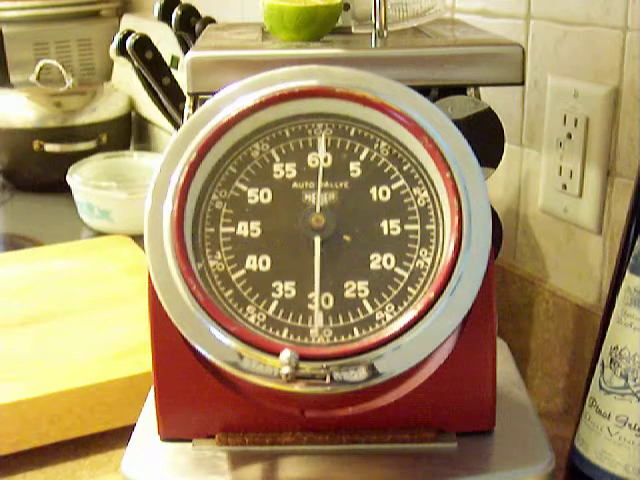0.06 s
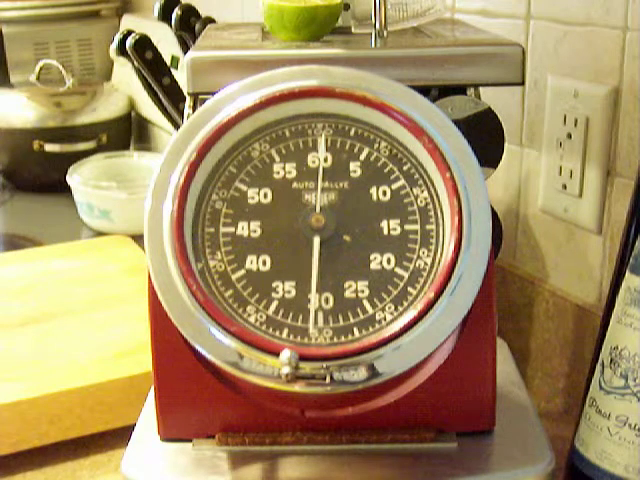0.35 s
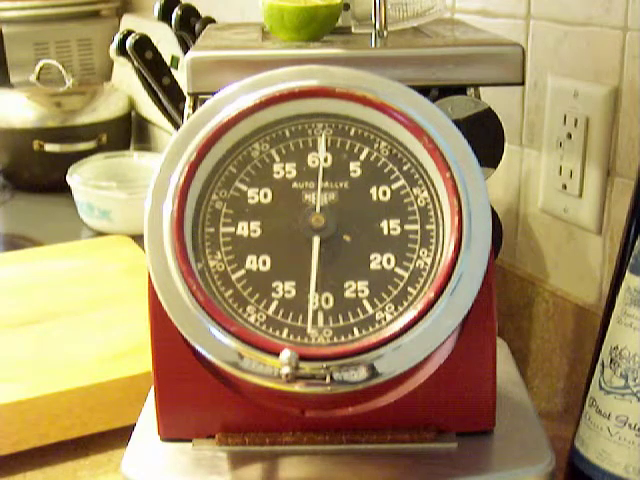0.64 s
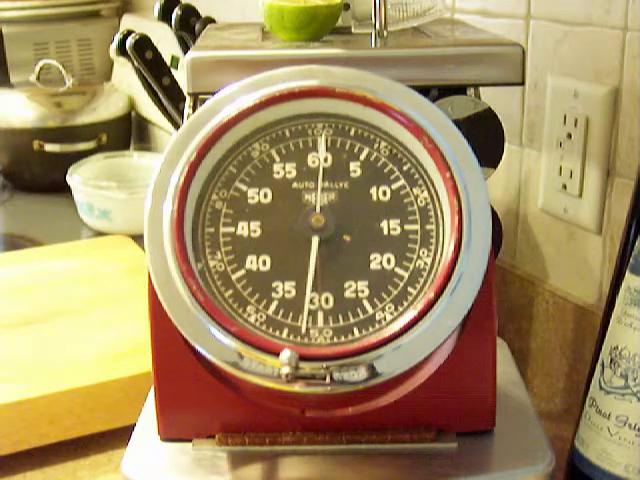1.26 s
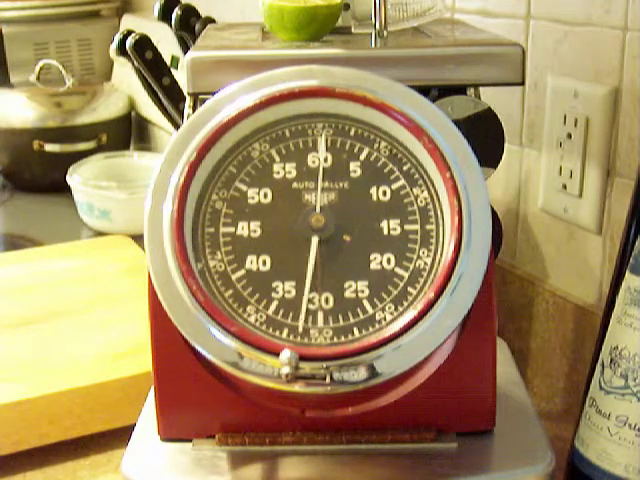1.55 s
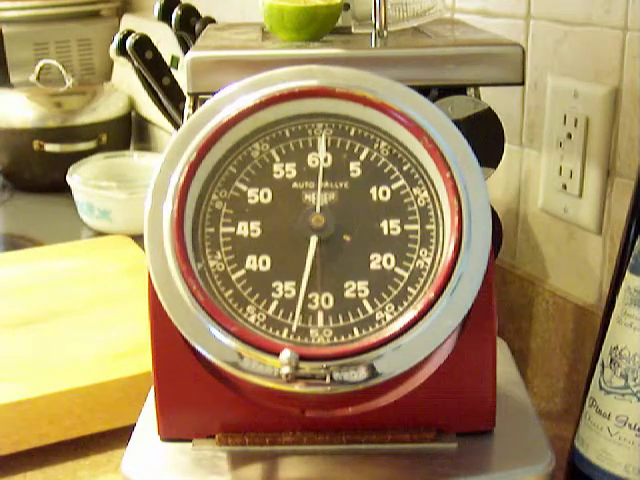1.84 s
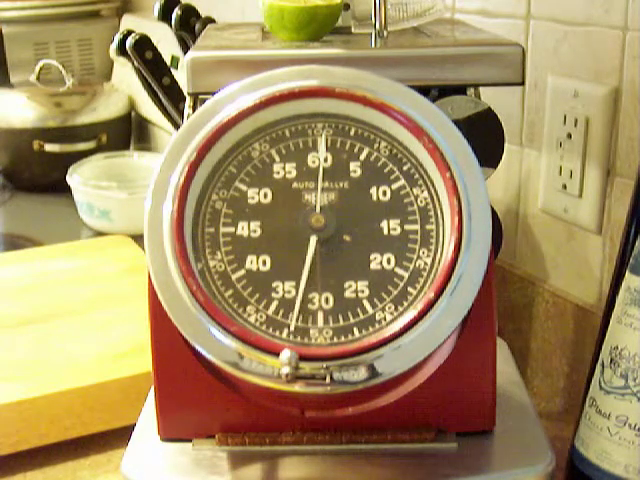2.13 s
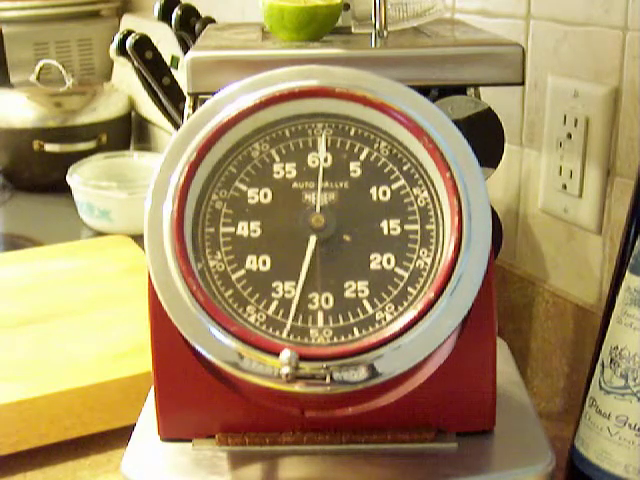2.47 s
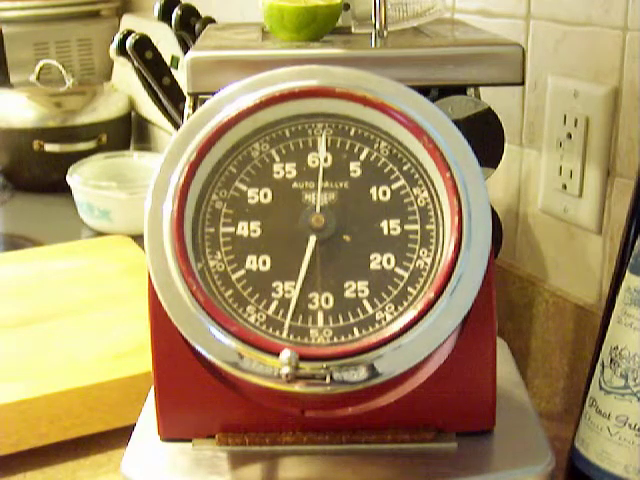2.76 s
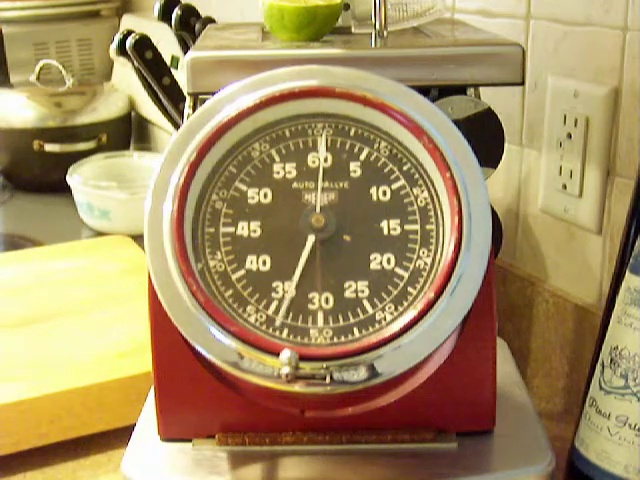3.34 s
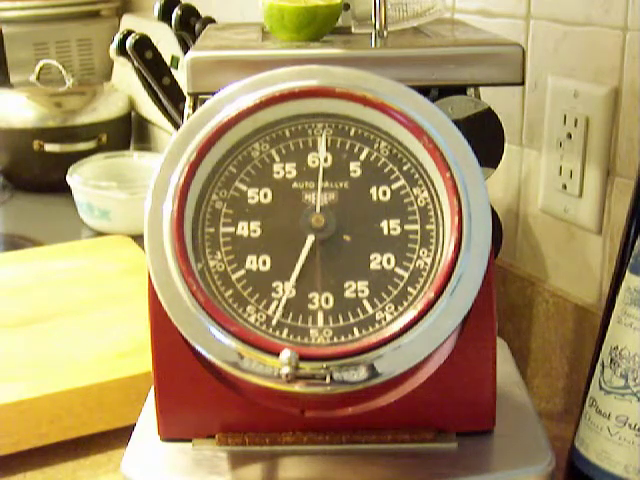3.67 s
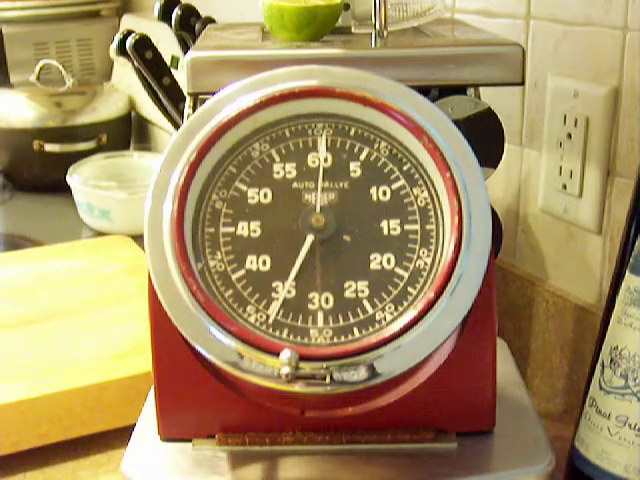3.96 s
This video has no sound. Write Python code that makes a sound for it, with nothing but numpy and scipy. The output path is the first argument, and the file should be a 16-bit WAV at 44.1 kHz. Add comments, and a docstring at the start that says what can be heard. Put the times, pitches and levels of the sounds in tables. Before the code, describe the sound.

A mechanical stopwatch ticks close by from about 0.1 seconds to the end at around 4 seconds, at an even four beats a second, alternating tick and tock. Each beat is a tiny cluster of scraping metal clicks with a slight ring and a very short room tail. Underneath, faint hiss, a low throbbing appliance hum and a thin high tone continue throughout in the quiet kitchen.

```python
"""Faint room noise, a throbbing appliance hum and a thin high tone fill a quiet kitchen from the start.
In front, a mechanical stopwatch runs at about four beats a second, tick and tock in turn.
Each beat is a quick run of contacts in the escapement (unlock, push, drop) that scrape and ring
the works; the drop also snaps and rings the case. Tiles and worktop add a short tail."""
import sys
import numpy as np
from scipy import signal
from scipy.fft import rfft, irfft
from scipy.io import wavfile
from scipy.ndimage import uniform_filter1d

SR = 44100
rng = np.random.default_rng(int(sys.argv[2]) if len(sys.argv) > 2 else 0)


def store_pcm(level_fs):
    """Save levels as 16-bit WAV."""
    pcm = np.round(np.clip(level_fs, -1, 1) * 32767).astype(np.int16)
    wavfile.write(sys.argv[1], SR, np.atleast_2d(pcm).T)


N = 4 * SR


def amp(db):
    """Decibels to gain."""
    return 10 ** (np.asarray(db) / 20)


def unit_rms(x):
    """Scales to rms 1."""
    return x / np.sqrt(np.mean(abs(x) ** 2) + 1e-20)


def db_at(spectrum, hz):
    """Interpolates (Hz, dB) points on a log-frequency axis."""
    points_hz, points_db = np.transpose(spectrum)
    return np.interp(np.log(hz + 1), np.log(points_hz + 1), points_db)


def colour(x, spectrum):
    """Filters x by (Hz, dB) points."""
    hz = np.fft.rfftfreq(len(x), 1 / SR)
    return irfft(rfft(x) * amp(db_at(spectrum, hz)), len(x))


def add(mix, start_s, sound):
    """Mixes a sound in at start_s."""
    part = mix[max(round(start_s * SR), 0):][:len(sound)]
    part += sound[:len(part)]


# Room noise floor. Each row: frequency in Hz, relative density in dB.
ROOM_SPECTRUM = [(15, -9), (40, 0.5), (85, 3.5), (170, 8), (370, 7), (650, 4), (1050, 3), (1350, 0.5),
                 (2000, -4), (2750, -4.5), (3400, -9), (5500, -12.5), (7000, -15.5), (9000, -16)]
# Room noise resonances. Each row: centre in Hz, half width in Hz, boost in dB.
ROOM_PEAKS = [(146.3, 13.5, 6.5), (288, 22, 3.5), (469.5, 22.4, 6), (618, 22, 4), (770, 20, 1.5),
              (974, 15, 3.5), (1750, 4.7, 6.5), (2002, 13, 6), (2640, 30, 1)]


def room_noise(rms_db=-44, flicker_db=0.36):
    """Steady rush with a few resonances and a slight flicker."""
    hz, _, bins = signal.stft(rng.standard_normal(N), SR, nperseg=4096)
    peaks_db = sum(db / (1 + ((hz - centre) / width) ** 4) for centre, width, db in ROOM_PEAKS)
    shape_db = db_at(ROOM_SPECTRUM, hz) + peaks_db
    flicker = unit_rms(uniform_filter1d(rng.standard_normal(bins.shape), size=24, axis=0))
    _, rush = signal.istft(bins * amp(shape_db[:, None] + flicker_db * flicker))
    return amp(rms_db) * unit_rms(rush[:N])


def drift(cutoff_hz):
    """Slow complex noise of rms 1."""
    noise = rng.standard_normal(N) + 1j * rng.standard_normal(N)
    rolloff = 1 + (np.fft.fftfreq(N, 1 / SR) / cutoff_hz) ** 4
    return unit_rms(np.fft.ifft(np.fft.fft(noise) / rolloff))


def wavering_tone(hz, rms_db, waver, throb_at_s=0.169):
    """A tone drifting in level and phase; close tones swell together at throb_at_s."""
    cycles = hz * (np.arange(N) / SR - throb_at_s)
    wobble = 1 + waver * drift(cutoff_hz=3.3)
    return amp(rms_db) * unit_rms((wobble * np.exp(2j * np.pi * cycles)).real)


def appliance():
    """Mains hum beats against a motor tone, under a faint whine."""
    mains = wavering_tone(hz=120.05, rms_db=-49.5, waver=0.041)
    motor = wavering_tone(hz=124.95, rms_db=-59.5, waver=0.041)
    whine = wavering_tone(hz=1090.1, rms_db=-58, waver=0.2)
    return mains + motor + whine


def high_tone(hz=6743, rms_db=-65.5):
    """A thin, steady electrical tone."""
    return amp(rms_db) * unit_rms(np.sin(2 * np.pi * hz * np.arange(N) / SR))


def ring(modes, t, force, rise_s, spread_db, detune=0.0027):
    """Struck modes die away; level and pitch vary from blow to blow."""
    hz, db, t60_s = np.transpose(modes)[:, :, None]
    louder, sharper = rng.standard_normal((2, len(hz), 1))
    level_db = db + db_at(force, hz) + spread_db * louder
    waves = np.sin(2 * np.pi * (hz * (1 + detune * sharper) * t + rng.random(hz.shape)))
    decay = np.exp(-np.log(1000) * t / t60_s)
    return (amp(level_db) * decay * waves).sum(0) * np.minimum(t / rise_s, 1)


# Steel contact noise. Each row: frequency in Hz, relative level in dB.
GRIT_SPECTRUM = [(300, -20), (900, -11), (1450, 7), (2100, -1), (2900, -6), (4200, -9.5), (5400, -4),
                 (6300, -7.5), (7300, -7.5), (8500, -2.5)]
# Modes of the works (plates, springs) and case. Each row: frequency in Hz, base level in dB, T60 in s.
WORKS_MODES = [(1990, -57.5, 0.065), (2620, -50, 0.055), (2804, -45, 0.054), (3570, -49.5, 0.055),
               (4970, -57, 0.058), (5340, -50.5, .05), (5570, -47.5, .06), (5750, -56.5, 0.043),
               (7130, -51, 0.056), (7190, -51, 0.057), (7730, -48, .035), (8360, -53.5, 0.035)]
CASE_MODES = [(1595, -40, 0.1), (1465, -47, 0.041)]


def contact(scrape_s, force, works_db, case_db, is_drop, snap_at_s=0.002, snap_width_s=0.00036):
    """Steel slides on steel and rings the works; at the drop a tooth hits the pallet and rings the case."""
    t = np.arange(6144) / SR
    steel_noise = unit_rms(colour(rng.standard_normal(len(t)), GRIT_SPECTRUM))
    grit = amp(-35) * colour(steel_noise, force)
    scrape = 2 * t / scrape_s * np.exp(-(t / scrape_s) ** 2)
    works = amp(works_db) * ring(WORKS_MODES, t, force, rise_s=0.0014, spread_db=2)
    sound = grit * scrape + works
    if is_drop:
        snap = amp(-5) * np.exp(-((t - snap_at_s) / snap_width_s) ** 2)
        case = amp(case_db) * ring(CASE_MODES, t, force, rise_s=0.002, spread_db=-1.5)
        sound += grit * snap + case
    return sound


# Beats, tick first. Each row: time of the drop in seconds, strength in dB, case ring in dB.
BEAT_SCORE = [(.1312, 0.5, 4.5), (.3872, 1.5, 1), (.6318, 0.5, 5), (.8905, 1, 1), (1.137, -0.5, 4.5),
              (1.3932, 0.5, -2), (1.6405, -1, 4.5), (1.896, 0, 4), (2.144, -0.5, -7), (2.400, -0.5, 1),
              (2.6482, 0, 5), (2.9035, .5, -3), (3.151, -0.5, 2), (3.4072, 1.5, 4.5), (3.6535, 0, -0.5),
              (3.9098, -.5, -3)]
# Frequencies of the four force bands in Hz.
FORCE_HZ = [1470, 2870, 5330, 7600]
# Contacts in a beat. Each row: offset from the drop in seconds, scrape time in seconds,
# gain in dB at each of FORCE_HZ, works ring in dB.
TICK_CONTACTS = [(-.0385, 0.0033, -13, -21, -4.5, -3, -2.5), (-.0335, 0.0026, -0.5, -4, -9.5, -6.5, 2),
                 (-.0280, .004, -13, -17, -8, -10, -4), (-.0088, 0.0071, -7.5, -11, -3, -1.5, -4),
                 (0, .004, -2.5, -3.5, 0, -2.5, 0.5), (.0055, .004, -9.5, -11, -10, -9.5, -3)]
TOCK_CONTACTS = [(-.0387, 0.0035, -17, -11, -4.5, 4, -11), (-.0335, 0.0048, -19, -5, -18, -18.5, 2),
                 (-.0275, 0.0049, -19.5, -22, -11, -16.5, -5), (-.0165, 0.0048, -2, -5, -12, -12, -7),
                 (-.0108, .005, -6, -5, -3.5, -7, -0.5), (0, 0.0027, -4.5, -1.5, -2.5, -1, -2),
                 (.0035, 0.0068, -5, 2, -2, -13.5, -4)]


def stopwatch(jitter_s=0.00052, spread_db=0.5):
    """Two pallets take turns; the contacts around each drop vary a little in time and force."""
    mix = np.zeros(N)
    for beat, (drop_s, beat_db, case_db) in enumerate(BEAT_SCORE):
        for offset_s, scrape_s, *band_db, works_db in (TICK_CONTACTS, TOCK_CONTACTS)[beat % 2]:
            is_drop = offset_s == 0
            later, harder = rng.standard_normal(2) * (not is_drop)
            force = list(zip(FORCE_HZ, band_db))
            sound = contact(scrape_s, force, works_db, case_db, is_drop)
            add(mix, drop_s + offset_s + jitter_s * later, amp(beat_db + spread_db * harder) * sound)
    return mix


def kitchen_reverb(direct, tail_db=-12, t60_s=0.14, rise_s=0.0026):
    """Tiles and worktop add a faint, short tail."""
    t = np.arange(SR // 2) / SR
    envelope = np.exp(-np.log(1000) * t / t60_s) * np.minimum(t / rise_s, 1)
    tail = rng.standard_normal(len(t)) * envelope
    return direct + amp(tail_db) * signal.fftconvolve(direct, tail / np.linalg.norm(tail))[:N]


def scene():
    """The stopwatch in front of the sounds of the room, in mono."""
    return (kitchen_reverb(stopwatch()) + room_noise() + appliance() + high_tone())[None]


# Microphone response. Each row: frequency in Hz, gain in dB.
MIC_RESPONSE = [(7000, 0), (7500, -3), (8000, -10.5), (8400, -15), (8700, -27), (8950, -31.5)]


def record(dry):
    """A small microphone dulls the top; a low-pass cuts at 9 kHz."""
    low_pass = signal.firwin(511, 9000, window=("kaiser", 9), fs=SR)
    return signal.oaconvolve(colour(dry[0], MIC_RESPONSE), low_pass, "same")[None]


dry = scene()
out = record(dry)
store_pcm(out)
```